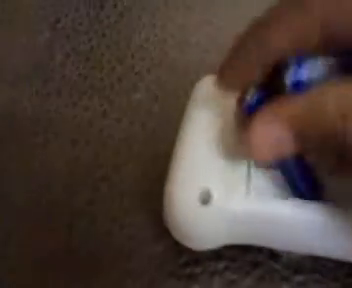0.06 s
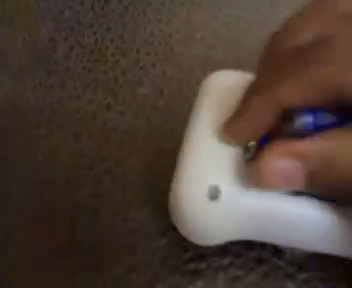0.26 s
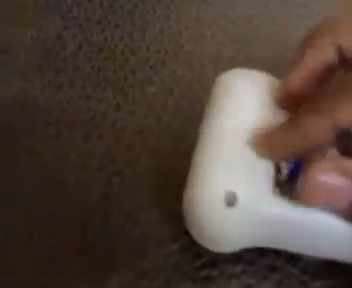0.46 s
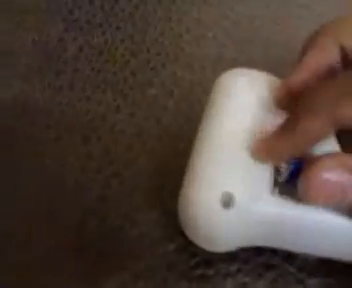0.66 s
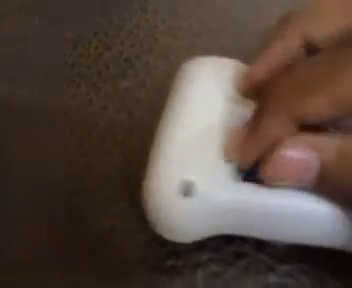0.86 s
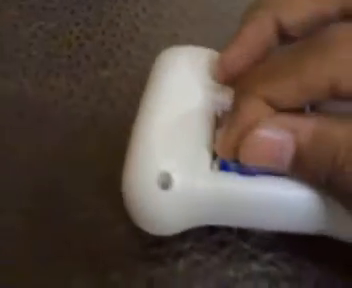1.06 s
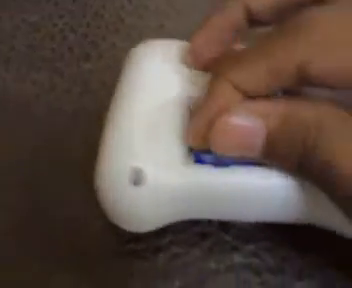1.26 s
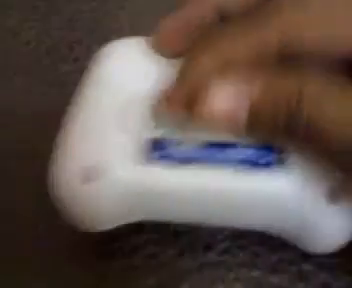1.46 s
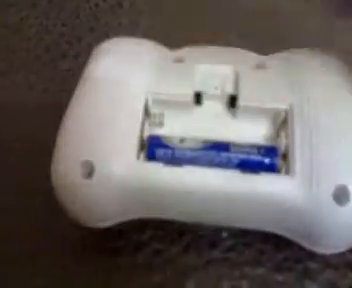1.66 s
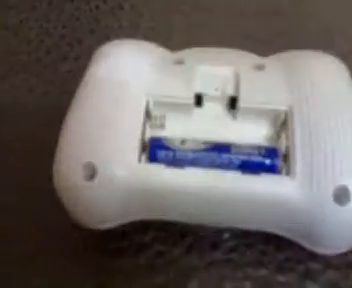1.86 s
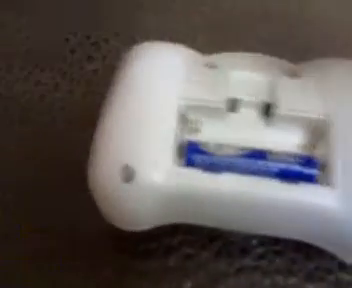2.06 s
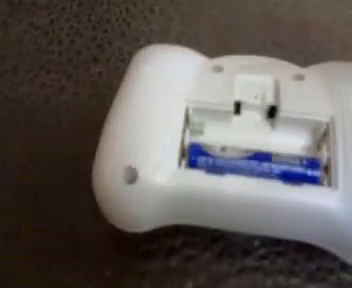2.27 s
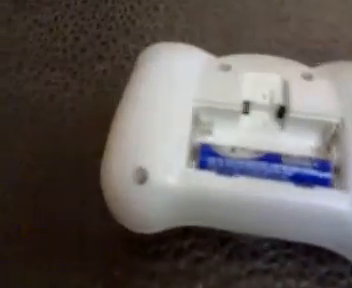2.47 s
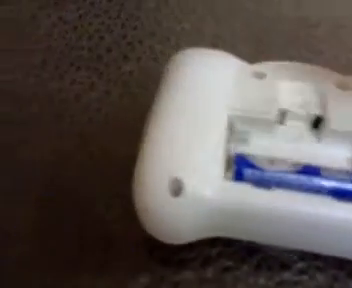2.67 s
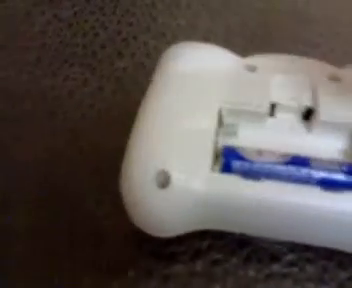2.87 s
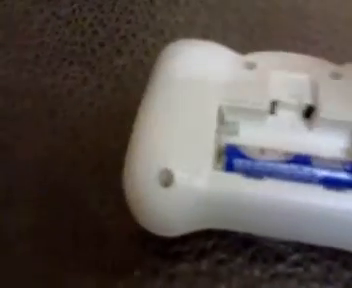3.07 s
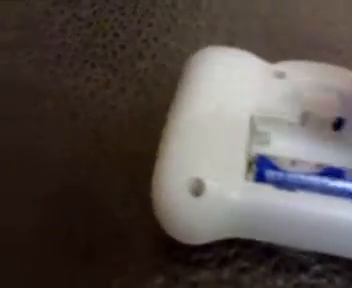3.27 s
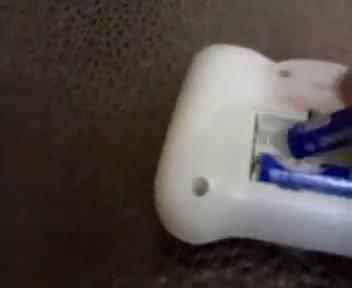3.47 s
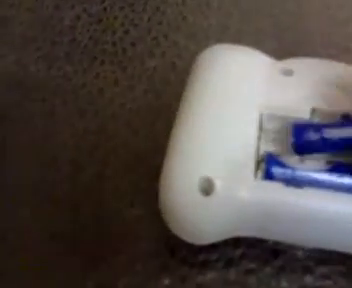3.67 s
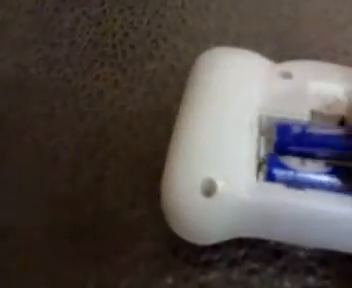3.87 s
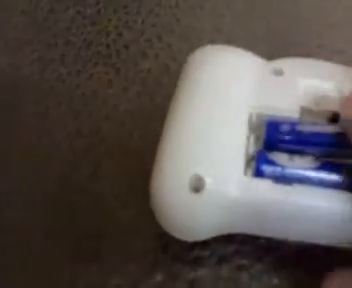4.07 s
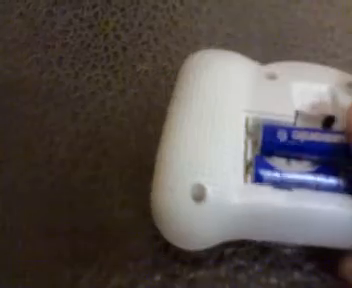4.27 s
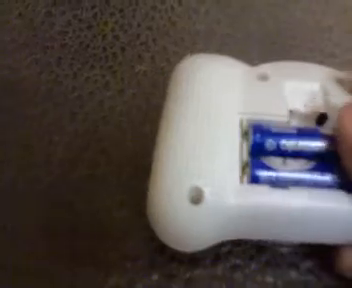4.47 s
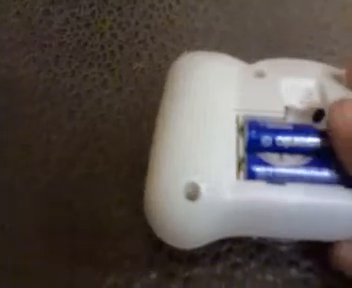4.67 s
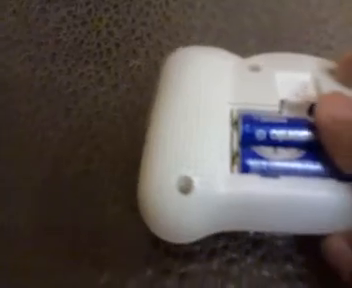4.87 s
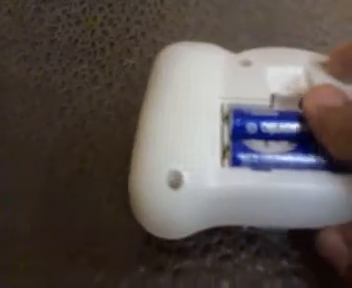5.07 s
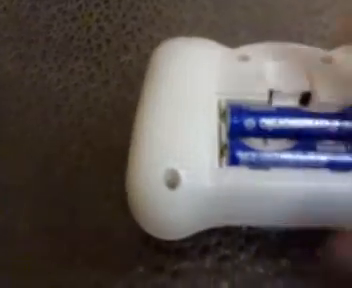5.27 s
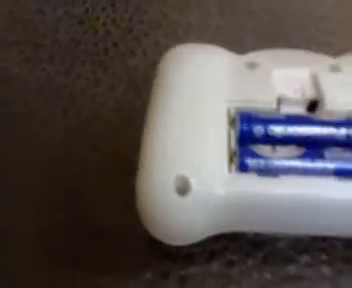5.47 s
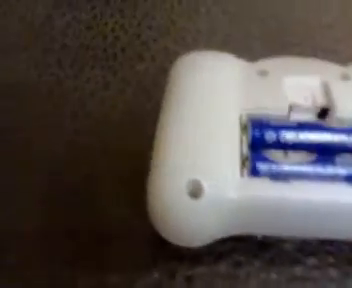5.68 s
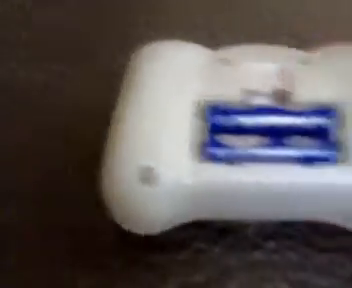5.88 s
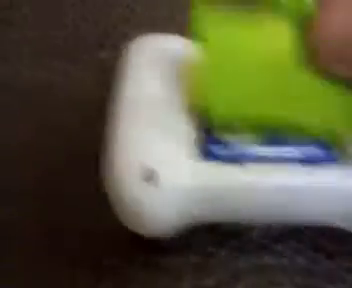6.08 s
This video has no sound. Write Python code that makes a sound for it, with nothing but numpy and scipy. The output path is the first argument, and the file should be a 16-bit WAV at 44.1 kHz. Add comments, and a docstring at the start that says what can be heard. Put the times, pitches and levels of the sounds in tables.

```python
"""A small hard room, close up: two small batteries are pushed into a remote's plastic compartment.
The cells scrape as they slide, and the hands rumble and thud softly on the case. Each contact rings
the hollow shell and the metal terminals, and the coil springs sing on after the hard snaps.
The walls add a bright tail over a steady hiss; the loudest snaps overload the microphone."""
import sys
import numpy as np
from scipy import signal
from scipy.fft import rfft, irfft, next_fast_len
from scipy.io import wavfile
from scipy.ndimage import uniform_filter1d

SR = 44100
rng = np.random.default_rng(int(sys.argv[2]) if len(sys.argv) > 2 else 0)


def bounce(signal):
    """Save signal as a 16-bit WAV file at the path given by the first command-line argument."""
    frames = np.transpose(np.atleast_2d(signal))
    limited = np.clip(frames, -1, 1)
    pcm = np.round(limited * 32767).astype(np.int16)
    wavfile.write(sys.argv[1], SR, pcm)


N = 269010
TIME = np.arange(N) / SR
# Fingers work on a cell. Each row: start in seconds, length in seconds, level in dB.
FINGER_WORK = [(0, 0.61, -65), (1.046, 0.384, -71), (3.388, 0.29, -59.5), (5.046, 0.92, -73.5)]
# A thin tick's balance over the five parts: shell, compartment walls, ribs, terminals, sharp edges.
TICK_BALANCE_DB = np.array([-2, -2, -14, -10.5, 1])


def undb(db):
    """Decibels to gain."""
    return 10 ** (np.asarray(db) / 20)


def unit(x):
    """Scale to rms 1."""
    return x / np.sqrt(np.mean(x ** 2) + 1e-30)


def add(out, start, x):
    """Mix x into out at start seconds."""
    i = max(int(start * SR), 0)
    out[i:i + len(x)] += x[:len(out) - i]


def fade(t, t60):
    """Free decay, 60 dB down after t60 seconds."""
    return np.exp(-np.log(1000) * t / t60)


def swell(start, hold, attack_s, release_t60):
    """Linear attack, hold and free decay."""
    attack = np.clip((TIME - start) / attack_s + .5, 0, 1)
    return attack * fade(np.maximum(TIME - start - hold, 0), release_t60)


def band(x, lo, hi, order=2):
    """Band-pass from lo to hi Hz."""
    return signal.sosfilt(signal.butter(order, [lo, hi], "band", fs=SR, output="sos"), x)


def colour(x, points):
    """EQ x along a curve of (Hz, dB) points."""
    hz, db = np.transpose(points)
    size = next_fast_len(len(x))
    bins_hz = np.maximum(np.fft.rfftfreq(size, 1 / SR), 1)
    gain = undb(np.interp(np.log(bins_hz), np.log(hz), db))
    return irfft(rfft(x, size) * gain, size)[:len(x)]


def room_tone(hiss_db=-52.5, whine_hz=1470):
    """Steady hiss with a faint whine that comes up late."""
    # The colour of the room's air. Each row: frequency in Hz, level in dB.
    air_eq = [(18, -36.5), (30, -0.5), (97, -21), (159, -8), (188, -4), (319, -6), (434, -13), (592, -9.5),
              (1100, -15.5), (1430, -13), (2200, -19.5), (2730, -19), (3150, -26.5), (5860, -32.5),
              (9000, -39), (11700, -87), (19800, -120)]
    hiss = colour(rng.standard_normal(N), air_eq)
    hiss = hiss / np.std(band(hiss, 150, 8000))
    whine = np.sin(2 * np.pi * whine_hz * TIME) * undb(np.interp(TIME, [3.5, 5], [-71, -62]))
    return undb(hiss_db) * hiss + whine


def scrapes(slips_per_s=3000, scatter_db=3, judder_db=2, squeak_hz=4350, squeak_db=-7):
    """Dense tiny slips hiss and squeak at the contact and murmur in the shell, juddering as they stick."""
    # Most strokes are a cell or finger sliding; the one at 4.474 s is a brief burst of hiss just ahead of the
    # loudest snap. Each row: midpoint in seconds, half-length in seconds, hiss in dB, shell murmur in dB.
    strokes = [(.004, 0.027, -41.5, -46), (0.04, .04, -46, -47.5), (0.273, 0.12, -53.5, -52.5),
               (0.747, .11, -51, -66), (1.431, 0.04, -48.5, -54.5), (1.503, 0.049, -54.5, -47.5),
               (2.161, .035, -62, -71.5), (2.55, .11, -63, -68.5), (3.38, 0.0067, -34.5, -57),
               (3.412, .046, -50.5, -59), (3.553, 0.038, -45.5, -44.5), (3.698, 0.025, -38.5, -38.5),
               (3.833, 0.031, -36, -39), (4.129, .02, -48.5, -61), (4.24, .005, -42, -56.5),
               (4.474, .008, -35.5, -33), (5.217, 0.028, -52.5, -51.5), (5.576, 0.035, -47, -58),
               (5.729, 0.046, -52, -57)]
    slips = (rng.random(N) < slips_per_s / SR) * rng.standard_normal(N)
    slips *= undb(scatter_db * rng.standard_normal(N))
    slips *= undb(judder_db * unit(band(rng.standard_normal(N), 20, 90)))
    hiss = colour(slips, [(1500, -34), (3000, -13.5), (3800, 1.5), (4500, 2), (5600, -1.5),
                          (6800, -9), (8000, -30.5), (12000, -62)])
    murmur = colour(slips, [(300, -23.5), (650, -5), (1000, 0), (1300, -2), (1700, -.5),
                            (2400, -16), (4000, -23.5), (9000, -58.5)])
    out = np.zeros(N)
    for middle, half, hiss_db, murmur_db in strokes:
        span = slice(max(int((middle - half) * SR), 0), int((middle + half) * SR))
        hz = squeak_hz * (1 + .025 * rng.standard_normal())
        squeak = band(slips[span], .89 * hz, 1.11 * hz)
        # light strokes that hardly stir the shell squeak the most
        contact = unit(unit(hiss[span]) + undb(squeak_db + hiss_db - murmur_db) * unit(squeak))
        pressure = np.cos(np.pi / 2 * (TIME[span] - middle) / half) ** 2
        out[span] += pressure * (undb(hiss_db) * contact + undb(murmur_db) * unit(murmur[span]))
    rubbing = sum(undb(db) * swell(start, length, attack_s=.04, release_t60=.15)
                  for start, length, db in FINGER_WORK)
    return out + rubbing * (unit(hiss) + undb(1) * unit(murmur))


def thump(hz, cycles=3.9):
    """A soft fingertip sets the held remote swinging for a few cycles."""
    t = np.arange(SR // 5) / SR
    soft_onset = (1 - np.exp(-4 * hz * t)) ** 2
    return -2 * np.sin(2 * np.pi * hz * t) * fade(t, cycles / hz) * soft_onset


def hands(uneven_db=2, attack_s=.019, bumps_per_s=15, bump_hz=116, spread_octaves=.22, max_bumps=10):
    """Each grip rumbles unevenly, bumps here and there and settles; a few fingertips land harder."""
    # The hands take a new grip. Each row: start in seconds, hold in seconds, level in dB.
    grips = [(0, .13, -45.5), (.66, .15, -35.5), (.95, .3, -40), (1.43, .13, -38), (1.86, 0.14, -50.5),
             (2.59, 0.064, -42.5), (2.84, .08, -48.5), (3.02, .14, -39), (3.26, .06, -41.5),
             (3.46, 0.027, -38.5), (3.64, 0.22, -40.5), (4.43, 0.22, -40.5), (4.61, .17, -29.5),
             (4.9, 0.18, -47.5), (5.24, 0.097, -36), (5.48, 0.13, -44.5), (5.85, 0.047, -45.5),
             (6.04, 0.042, -41)]
    # The colour of their rumble. Each row: frequency in Hz, level in dB.
    rumble_eq = [(15, 3), (35, 6.5), (70, 2.5), (120, -3.5), (180, -10.5), (260, -16), (400, -27),
                 (800, -58.5)]
    # Fingertips land on the shell. Each row: start in seconds, level in dB, pitch in Hz.
    fingertips = [(.03, -28, 195), (.195, -31, 210), (.71, -29, 90), (0.989, -23.5, 146),
                  (1.047, -18.5, 115), (3.479, -45, 91), (3.675, -23.5, 91), (3.788, -27, 110),
                  (4.623, -16.5, 194), (4.704, -16, 113), (4.732, -19, 192), (4.745, -14, 129),
                  (5.269, -20, 54)]
    rumble = unit(colour(rng.standard_normal(N), rumble_eq))
    rumble /= np.sqrt(uniform_filter1d(rumble ** 2, SR // 10) + 1e-9)  # even out the slow swings
    rumble *= undb(uneven_db * unit(band(rng.standard_normal(N), 5, 22)))
    out, power = np.zeros(N), np.zeros(N)
    for start, hold, db in grips:
        press = swell(start, hold, attack_s, release_t60=.17)
        settle = undb(-8.5) * swell(start, hold, attack_s, release_t60=1.6)  # the flesh goes on settling
        power += (undb(db) * np.maximum(press, settle)) ** 2
        lags = (np.arange(max_bumps) + rng.random(max_bumps)) / bumps_per_s
        for lag, pitch in zip(lags, rng.standard_normal(max_bumps)):
            if lag < hold:
                add(out, start + lag, undb(db + 1) * thump(bump_hz * 2 ** (spread_octaves * pitch)))
    for start, db, hz in fingertips:
        add(out, start, undb(db) * thump(hz))
    return out + undb(.5) * np.sqrt(power) * rumble


def room_reverb(x, first_s=.004, build_s=.0024, patchy_db=3, far_s=.027, far_spread_s=.02):
    """Near walls answer first, far walls add a cluster of echoes, and all thicken into a bright tail."""
    # The tail in octave bands. Each row: centre in Hz, level in dB, t60 in seconds.
    octaves = [(248, -2.5, 0.44), (490, -9.5, 0.51), (1060, -11, 0.59), (1852, -7.5, 0.55),
               (4000, -10.5, 0.53), (7066, -15, 0.68)]
    t = np.arange(int(.7 * SR)) / SR
    echoes = rng.standard_normal(len(t))
    echoes *= undb(patchy_db * rng.standard_normal(len(t)) * fade(t, .61))
    build_up = 1 - np.exp(-np.maximum(t - first_s, 0) / build_s)
    far_cluster = 1 + .63 * np.exp(-((t - far_s) / far_spread_s) ** 2)
    response = 0
    for centre, db, t60 in octaves:
        lo, hi = centre / np.sqrt(2), centre * np.sqrt(2)
        tail = band(echoes, lo, hi, order=3) * fade(t, t60) * build_up * far_cluster
        response += undb(db) * tail / np.linalg.norm(tail) * np.sqrt(hi / SR)
    return signal.oaconvolve(x, response)[:N]


def battery_contacts(second_cell_s=3, padded_edges_db=-7.5):
    """Cue the snaps, creaks and ticks, each as a start in seconds and the five parts' levels in dB."""
    # A cell meets the remote. Each row: start in seconds, then shell, walls and terminals in dB.
    snaps = [(.067, -27, -46, -38.5), (0.0741, -22.5, -41.5, -36), (.246, -35, -44.5, -57),
             (0.2498, -28.5, -45, -52), (0.254, -29.5, -52, -44), (.276, -39, -35.5, -57.5),
             (0.4188, -15, -15.5, -16), (0.4198, -30.5, -33, -18.5), (0.4295, -21, -16, -25),
             (.463, -30.5, -30, -36), (0.7694, -17.5, -13.5, -18), (.772, -24, -23.5, -16),
             (0.7875, -25.5, -23.5, -37.5), (.883, -36, -58, -59), (1.011, -41, -60, -63),
             (.9126, -17, -15, -21.5), (1.4208, -42, -52.5, -66), (1.4262, -51, -44, -36.5),
             (3.3632, -41, -52.5, -55), (3.4049, -33.5, -33.5, -38.5), (3.412, -33, -44, -37),
             (3.6861, -26.5, -35, -48), (3.714, -29, -20.5, -25), (3.8249, -21, -17.5, -19),
             (3.8767, -23, -22, -28.5), (4.402, -45, -52, -55.5), (4.4769, -5, -7.5, -20),
             (4.485, -14.5, -13.5, -11), (4.488, -21.5, -22, -12.5), (4.6706, -27, -28.5, -40.5)]
    # A cell's rim catches on a rib or a coil. Each row: start in seconds, level in dB.
    creaks = [(.355, -45), (.574, -42), (.613, -49.5), (.6631, -45.5), (.7269, -46), (.7935, -32),
              (4.4795, -12)]
    # Thin ticks of a nail or a cell's rim. Each row: start in seconds, level in dB.
    ticks = [(1.2511, -57.5), (1.9458, -53.5), (4.064, -52.5), (4.2783, -56.5), (5.5375, -52.5)]
    creak_balance_db = np.array([-17, -4.5, 0, -11.5, -14.5])
    cues = []
    for start, shell_db, walls_db, terminals_db in snaps:
        padding = np.clip((shell_db - walls_db) / 10, 0, 1)  # a finger in the way mutes the edges
        edges_db = terminals_db + (-5 if start > second_cell_s else -3.5) + padded_edges_db * padding
        ribs_db = walls_db - 9
        cues.append((start, [shell_db, walls_db, ribs_db, terminals_db, edges_db]))
    cues += [(start, db + creak_balance_db) for start, db in creaks]
    return cues + [(start, db + TICK_BALANCE_DB) for start, db in ticks]


def strike(part_db, crack_db, detune=.038, crack_t60=.035, padded_crack_db=-9):
    """One contact: each part of the remote rings with its modes and a crack, as hard as it is hit."""
    # The remote's modes. Each row: frequency in Hz, level in dB, t60 in seconds.
    body_modes = [(720, -13, 0.011), (965, -1.5, 0.014), (1126, -4.5, .012), (1354, -5.5, 0.024),
                  (1546, -4, 0.023), (1742, -5, 0.026), (1929, -0.5, 0.019), (2700, 0, 0.0066),
                  (3295, -3.5, 0.02), (3825, -7.5, 0.043), (4123, -4, 0.018), (4485, 2, .014),
                  (5170, -1, 0.018), (5870, -4, .012), (6560, -13.5, 0.0058)]
    # The colour of the crack. Each row: frequency in Hz, level in dB.
    crack_eq = [(100, -25), (600, -14.5), (950, -5), (2000, 3.5), (2800, -6.5), (4300, 2), (5800, -7.5),
                (7200, -3.5), (8500, -30.5), (12000, -50)]
    # Band limits of the five parts in Hz, from the shell up to the sharp edges.
    limits_hz = [620, 1250, 2400, 3400, 5000, 7000]
    t = np.arange(SR // 20) / SR
    hz, db, t60 = np.transpose(body_modes)
    # the grip and the point of contact shift and weight the modes
    shift, weight = rng.standard_normal((len(hz), 2)).T
    phase = 2 * np.pi * (hz * (1 + detune * shift))[:, None] * t
    gain = undb(db + 2 * weight) * rng.choice([-1, 1], len(hz))
    modes = gain[:, None] * np.sin(phase) * fade(t, t60[:, None])
    crack = colour(rng.standard_normal(len(t)), crack_eq) * fade(t, crack_t60)
    # a touch that stirs only the shell is padded by a finger: it builds more slowly and cracks less
    padding = np.clip((part_db[0] - part_db[1]) / 20, 0, 1)
    rise_s = .00018 + .0006 * padding
    crack_gain = undb(crack_db + padded_crack_db * padding)
    out = 0
    for lo, hi, level_db in zip(limits_hz, limits_hz[1:], part_db):
        ring = unit(modes[(hz >= lo) & (hz < hi)].sum(0))
        part = ring + crack_gain * unit(band(crack, lo, hi, order=3))
        part *= 1 - np.exp(-t / rise_s)
        attack = part[:int(.006 * SR)]
        out += undb(level_db) * part / np.std(attack)
    return out


def clicks(cues, crack_db, knock_db=-19, knock_hz=340, knock_t60=.012):
    """A strike on every cue; the whole remote recoils with a dull knock under the shell's ring."""
    out, t = np.zeros(N), np.arange(SR // 20) / SR
    knock = np.sin(2 * np.pi * knock_hz * t) * fade(t, knock_t60)
    for start, part_db in cues:
        add(out, start, strike(part_db, crack_db) + undb(part_db[0] + knock_db) * knock)
    return out


def stray_ticks(per_s=4, loudest_db=-64.5, max_ticks=8):
    """Cue faint ticks at random moments while the fingers work."""
    cues = []
    for start, length, _ in FINGER_WORK:
        lags = np.cumsum(.5 + rng.random(max_ticks)) / per_s
        levels_db = loudest_db - 10 * rng.random(max_ticks)
        cues += [(start + lag, db + TICK_BALANCE_DB) for lag, db in zip(lags, levels_db) if lag < length]
    return cues


def springs(detune=.001):
    """The coil springs are let go and ring on with close, thin partials."""
    # Each row: start in seconds, level in dB, battery bay (0 or 1).
    twangs = [(0.419, -35, 0), (0.774, -40.5, 0), (.914, -46, 0), (3.716, -45.5, 1), (3.827, -32.5, 1),
              (4.488, -25, 1), (4.507, -25.5, 1)]
    # The partials of each bay's spring. Each row: frequency in Hz, level in dB, t60 in seconds.
    first_coil = [(2037, -12.5, .5), (2315, -8.5, 0.44), (2736, -4, 0.65), (3167, -7.5, .4), (3741, -8, .4),
                  (4085, -11.5, .35), (4323, -9.5, .3), (4420, -5.5, 0.71), (4140, -16.5, 1.116)]
    second_coil = [(2120, -12, .35), (2240, -18.5, .35), (2540, -3.5, 0.43), (2540, -6.5, 0.24),
                   (2606, 1, .32), (2834, -6.5, 0.19), (2840, -14, 0.17), (2870, -13, .3), (4100, -7.5, .3),
                   (4615, -13, .2)]
    out, t = np.zeros(N), np.arange(SR) / SR
    for start, level_db, bay in twangs:
        hz, db, t60 = np.transpose(second_coil if bay else first_coil)
        hz = hz * (1 + detune * rng.standard_normal(len(hz)))
        phase = 2 * np.pi * (hz[:, None] * t + rng.random((len(hz), 1)))
        partials = np.sin(phase) * fade(t, t60[:, None])
        gain = undb(db) / np.linalg.norm(undb(db))
        add(out, start, undb(level_db) * gain @ partials)
    return out


def scene(faces=3):
    """The microphone hears one face of the remote; the walls hear several, each with its own mode mix."""
    ring_and_scrape = springs() + scrapes()
    cues = battery_contacts()
    reverb = sum(room_reverb(clicks(cues, crack_db=-1.5) + ring_and_scrape) for _ in range(faces))
    direct = clicks(cues, crack_db=-8.5) + ring_and_scrape + hands()
    mix = direct + reverb / np.sqrt(faces) + room_tone() + clicks(stray_ticks(), crack_db=-5.5)
    return mix[None]


def record(dry, band_hz=7300, ceiling=.74, dull_hz=8500, top_hz=16000, dc_offset=-.015):
    """A narrow-band microphone flattens the loudest snaps, which splatter into the treble."""
    narrow = signal.sosfilt(signal.ellip(8, .3, 60, band_hz, fs=SR, output="sos"), dry)
    clipped = narrow / (1 + (narrow / ceiling) ** 8) ** (1 / 8)
    dulled = signal.sosfilt(signal.butter(1, dull_hz, fs=SR, output="sos"), clipped)
    return signal.sosfilt(signal.ellip(8, .2, 70, top_hz, fs=SR, output="sos"), dulled) + dc_offset


dry = scene()
out = record(dry)
bounce(out)
```